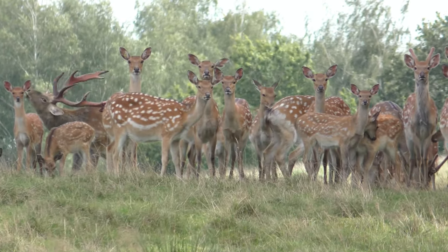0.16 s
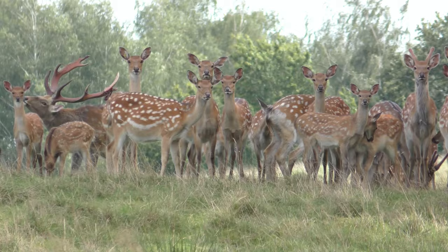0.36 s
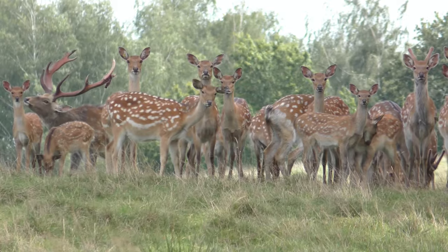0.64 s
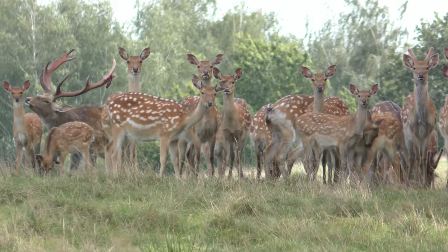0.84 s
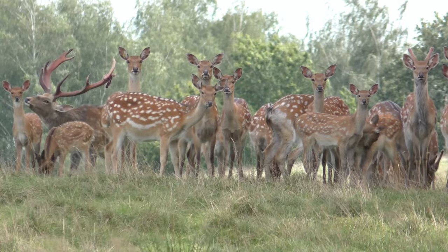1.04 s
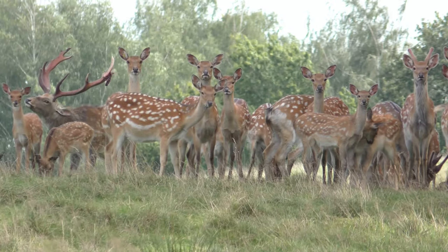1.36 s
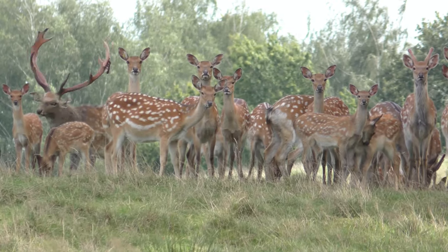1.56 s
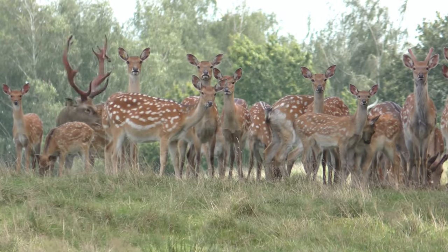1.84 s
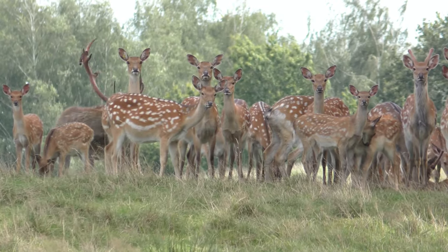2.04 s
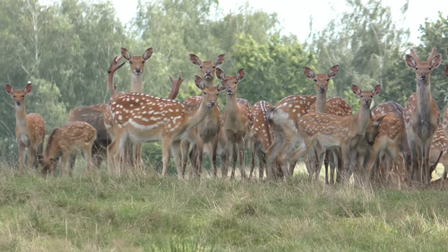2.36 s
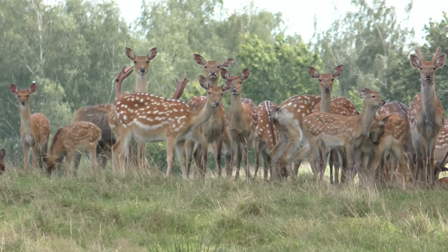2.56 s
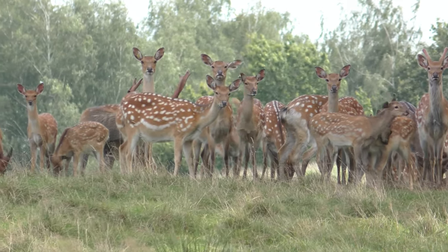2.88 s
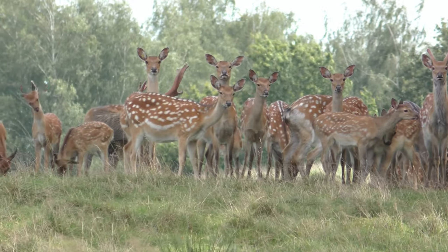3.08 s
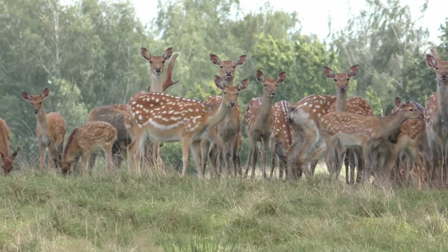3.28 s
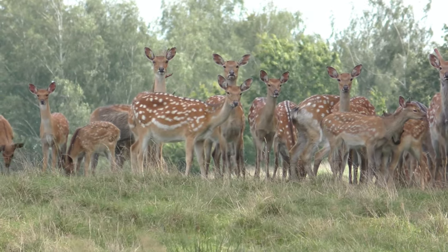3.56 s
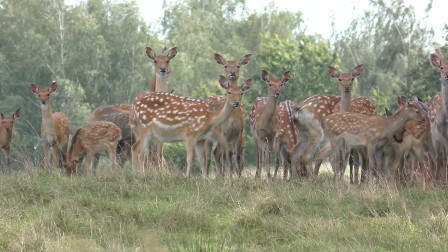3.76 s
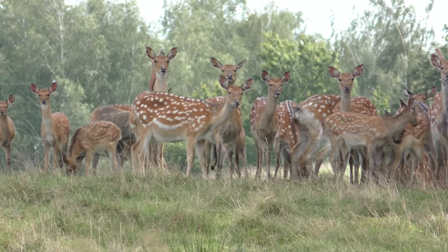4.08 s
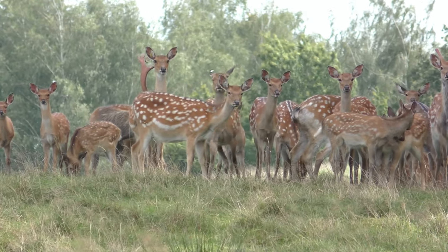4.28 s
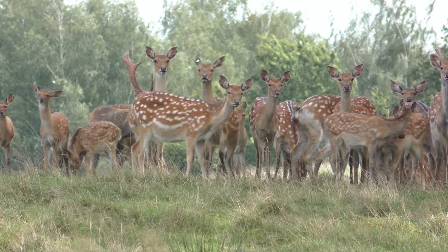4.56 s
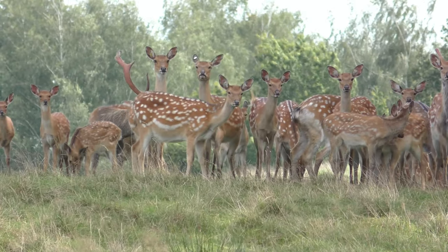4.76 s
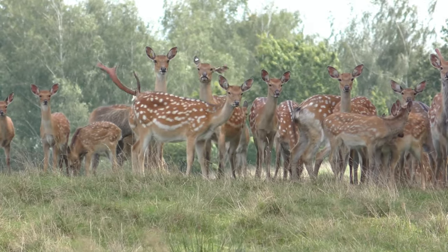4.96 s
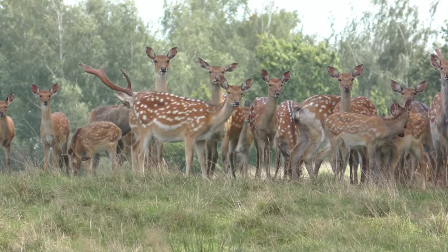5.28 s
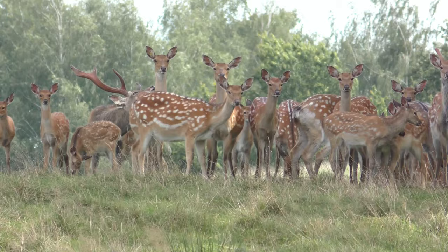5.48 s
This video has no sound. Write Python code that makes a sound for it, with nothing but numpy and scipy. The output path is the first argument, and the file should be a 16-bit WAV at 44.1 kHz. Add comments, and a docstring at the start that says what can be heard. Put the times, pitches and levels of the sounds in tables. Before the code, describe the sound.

High, squeaky deer calls, sometimes overlapping, echo faintly across a meadow over a steady low wind rumble.

```python
"""A shrill squeal cuts through low wind; then the hinds of a deer herd squeak to each other in a meadow.
Tight vocal folds give each squeak a high, nearly pure voice that arches, sags and often breaks into
a short croak as the folds slacken; the last sinks into a bleat. A line of trees returns a faint long echo.
Wind rumbles on the microphone, far leaves hiss, the grass rustles and a few dull thuds sound."""
import sys
import numpy as np
from scipy import signal
from scipy.fft import rfft, irfft, next_fast_len
from scipy.io import wavfile
from scipy.ndimage import uniform_filter1d

SR = 44100
rng = np.random.default_rng(int(sys.argv[2]) if len(sys.argv) > 2 else 0)


def dump_mix(stems):
    """Bounce the given channels to the path in sys.argv[1] as a 16-bit WAV at rate SR."""
    frames = np.atleast_2d(stems).T  # one column per channel
    limited = np.clip(frames, -1, 1)  # hard clip at full scale
    pcm = np.round(limited * 32767).astype(np.int16)
    wavfile.write(sys.argv[1], SR, pcm)


N = 248283
TIME = np.arange(N) / SR
SETTLE_S = .02   # a voice finds its note

# Hind calls, five groups each:
#   timing (start [s], length [s])
#   pitch  (note [Hz], scoop [share], fall [share], fall lateness [exponent], final break [share])
#   slips  list of (onset in call [s], pitch drop [share])
#   effort (level [dB], swell [dB], attack [s], dip time [s], dip depth [dB], dip width [s])
#   timbre (2nd harmonic at start, dip, end [dB], 3rd, 4th [dB re mean 2nd],
#           half-pitch lines [dB re fundamental], rasp [dB re fundamental], flutter [dB])
SQUEAKS = [ ((.551, .243), (5065, .12, .25, 3.7, .2), [(.035, .025), (.11, .008), (.187, .018)],
           (-13.9, 7.7, .017, .212, 15.5, .05), (-41, -51, -52, -3.5, -19, -40.5, -33.5, 1.5)),
           ((1.246, .216), (2775, .03, .38, 3.7, .42), [(.008, .05), (.18, .07)],
           (-19.9, -13.5, .016, .05, 13, .055), (-58, -45, -46, -7, -33, -37, -44, .6)), ((1.359, .272),
           (3550, .03, .31, 3.4, .01), [(.011, .025), (.09, .008), (.12, .015)],
           (-20, -5.6, .028, .149, 14.5, .027), (-51, -34, -64, -17, -17, -43, -35, .9)), ((2.493, .093),
           (3540, .02, .3, 1.6, .09), [(.037, .11)], (-18.2, -15, .018, .039, 16, .011),
           (-44, -38, -60, -19, -24, -44.5, -38, 2.6)), ((3.118, .298), (2835, -.07, .19, 4.5, .17),
           [(.112, .048), (.255, .085)], (-23.3, 4.2, .024, .024, 6, .013),
           (-57, -47, -39, -9.5, -14.5, -53.5, -48.5, .6)), ((4.3, .28), (4730, .02, .32, 1.15, .01),
           [(.088, .065), (.195, .03)], (-35.8, -4.5, .045, .229, 15, .012),
           (-71, -57, -64, -28, -30, -40, -38, 1.9)), ((4.426, .259), (2642, .01, .41, 4.8, .01),
           [(.008, .04)], (-31, 5, .016, .067, 8.9, .021), (-54, -45, -47, -11, -35, -27, -40.5, 1.1)),
           ((4.678, .422), (3160, .08, .33, 2.0, .02), [(.13, .015), (.216, .05)],
           (-36.5, 2, .035, .39, 16, .05), (-72, -84, -88, -22, -32, -43, -30, 1.27)), ((5.094, .042),
           (2000, .01, .07, 1.2, .02), [], (-34.5, -6, .013, .03, 2, .01),
           (-57, -68, -74, -22, -32, -41, -28.5, 1.27))]


def squeaks(out):
    """Each call swells or wanes; its fundamental dips once, where the second harmonic turns."""
    for (start_s, length_s), contour, slips, effort, timbre in SQUEAKS:
        mid_db, swell_db, attack_s, dip_s, dip_db, dip_width_s = effort
        start_db, turn_db, end_db, *colour = timbre
        t = elapsed(length_s)
        level_db = mid_db + swell_db * (t / length_s - .5) - dip_db * hump(t, dip_s, dip_width_s)
        second_db = np.interp(t, [0, dip_s, length_s], [start_db, turn_db, end_db])
        pitch_hz = squeak_pitch(t, slips, *contour)
        voice = tight_folds(t, pitch_hz, level_db, second_db, second_db.mean(), *colour)
        add(out, start_s, envelope(t, attack_s, release_s=.011) ** 1.4 * voice)


def squeak_pitch(t, slips, note_hz, scoop, fall, lateness, final_break,
                 flick_s=.005, slip_s=.005, recover_s=.03, break_s=.006):
    """The voice flicks in from above, settles, slips, sags ever faster as effort runs out, then breaks."""
    flick = .09 * np.exp(-t / flick_s)
    sag = fall * (t / t[-1]) ** lateness
    pitch_hz = note_hz * (1 + flick - scoop * np.exp(-t / SETTLE_S) - sag)
    for onset_s, drop in slips:
        since_s = np.maximum(t - onset_s, 0)
        pitch_hz *= 1 - drop * np.minimum(since_s / slip_s, 1) * np.exp(-since_s / recover_s)
    waver = 1 + .0035 * drift(30, len(t))
    collapse = 1 - final_break * np.exp((t - t[-1]) / break_s)
    return pitch_hz * waver * collapse


def tight_folds(t, pitch_hz, level_db, second_db, treble_db, third_db, fourth_db, half_db, rasp_db,
                flutter_db, jitter_per_db=.0027, upper_db_per_oct=16, half_db_per_oct=70):
    """Tightly stretched vocal folds: a strong fundamental with weak harmonics."""
    size = len(t)
    median_hz = np.median(pitch_hz)
    sag_oct = np.minimum(np.log2(pitch_hz / median_hz), 0)
    jitter = jitter_per_db * flutter_db * drift(120, size)
    phase = 2 * np.pi * np.cumsum(pitch_hz * (1 + jitter)) / SR
    level = from_db(level_db + flutter_db * drift(40, size))
    # uneven cycles spread noise round each harmonic, most at the onset
    rasp = from_db(rasp_db + 6 * np.exp(-t / .08) + 2 * drift(60, size))
    skirt = signal.butter(2, .22 * median_hz, fs=SR, output="sos")
    gain_noise, phase_noise = rasp * rms_one(signal.sosfilt(skirt, rng.standard_normal((2, size))))
    voice = level * (1 + gain_noise) * np.sin(phase + phase_noise)
    # upper harmonics fade as the folds slacken
    upper_db = treble_db + upper_db_per_oct * sag_oct
    overtones_db = [second_db, upper_db + third_db, upper_db + fourth_db, upper_db + fourth_db - 11]
    for k, db in enumerate(overtones_db, 2):
        overtone = (1 + from_db(9) * gain_noise) * np.sin(k * (phase + phase_noise))
        voice += from_db(db + 2 * drift(25, size)) * overtone * (k * pitch_hz < SR / 2)
    # alternate cycles differ while the folds are tight
    half_lines = np.sin(phase / 2) + .8 * np.sin(1.5 * phase) + .15 * np.sin(2.5 * phase)
    voice += level * from_db(half_db + half_db_per_oct * sag_oct + 3 * drift(25, size)) * half_lines
    hiss = rms_one(resonate(rng.standard_normal(size), pitch_hz.max(), .9 * median_hz))
    return np.sqrt(2) * voice + level * rasp * from_db(-14) * hiss


# Second, low vibration of the folds: (time [s], pitch [Hz], fundamental [dB], 2nd harmonic [dB])
UNDERTONE = [(.562, 1480, -53.5, -59), (.59, 1520, -37, -44), (.613, 1370, -37, -46.5),
             (.63, 1653, -45.5, -54), (.665, 2050, -57.5, -66), (.72, 1950, -53, -63.5),
             (.76, 1000, -63, -72)]


def undertone(out):
    """A faint, raspy second note wanders beneath the shrill squeal."""
    times_s, *columns = np.transpose(UNDERTONE)
    t = elapsed(times_s[-1] - times_s[0])
    pitch_hz, level_db, second_db = (np.interp(times_s[0] + t, times_s, column) for column in columns)
    voice = tight_folds(t, pitch_hz, level_db, second_db, treble_db=second_db,
                        third_db=9, fourth_db=2, half_db=-32, rasp_db=-14, flutter_db=3)
    add(out, times_s[0], envelope(t, attack_s=.003, release_s=.003) * voice)


# Call onsets: (time [s], level [dB], fade [s], mouth [Hz], width [Hz], bright edge [dB])
CATCHES = [(.553, -41.5, .065, 3020, 2400, -49.5), (1.233, -46, .011, 1903, 1195, -64),
           (3.113, -44.5, .0076, 1490, 2200, -61), (4.296, -53.5, .008, 4423, 1200, -78),
           (4.416, -50, .0091, 2100, 1390, -68)]


def catches(out):
    """The voice catches briefly as it starts."""
    for start_s, *mouth in CATCHES:
        add(out, start_s, mouth_croak(*mouth))


# Call endings:
# (time [s], level [dB], fade [s], mouth [Hz], width [Hz], bright edge [dB], chest [dB], chest [Hz])
CROAKS = [(.795, -30.5, .015, 870, 220, -47, -41.5, 410), (1.454, -40, .008, 1250, 420, -65, -53, 255),
          (1.64, -57, .021, 1100, 717, -72, -68, 270), (2.597, -44, .021, 680, 446, -66, -52, 285),
          (3.412, -22.5, .007, 1400, 520, -42, -31.5, 790),
          (4.683, -49.5, .011, 1120, 1198, -70, -50.5, 243)]


def croaks(out, lag_cycles=2.8, fade_cycles=7.5):
    """As the voice lets go, the mouth rings and the chest follows."""
    for start_s, *mouth, chest_db, chest_hz in CROAKS:
        add(out, start_s, mouth_croak(*mouth))
        chest = croak(chest_db, fade_cycles / chest_hz, chest_hz, width_hz=.7 * chest_hz)
        add(out, start_s + lag_cycles / chest_hz, chest)


def mouth_croak(level_db, fade_s, mouth_hz, width_hz, edge_db):
    """A croak through the mouth's first resonance and, more faintly, its next."""
    first = croak(level_db, fade_s, mouth_hz, width_hz)
    return first + croak(edge_db, 1.5 * fade_s, 2.7 * mouth_hz, 4.5 * width_hz)


def croak(level_db, fade_s, resonance_hz, width_hz, pitch_hz=430, lowpass_hz=5500):
    """Loose pulses ring through one resonance and die away."""
    t = elapsed(.2)
    folds = slack_folds(np.full(SR // 4, pitch_hz), roughness=1.2)
    lowpass = signal.butter(2, lowpass_hz, fs=SR, output="sos")
    voice = signal.sosfilt(lowpass, resonate(folds, resonance_hz, width_hz))
    voice = rms_one(voice[-len(t):])
    voice /= np.sqrt(uniform_filter1d(voice ** 2, size=220) + 1e-3)   # level evened over 5 ms
    decay = np.exp(-np.maximum(t - .005, 0) / fade_s)
    return from_db(level_db) * voice * np.minimum(t / .002, 1) * decay


def slack_folds(pitch_hz, roughness, jitter=.14, air=.45, limp=.6):
    """One pulse a cycle, uneven in time, alternately strong and weak, with air let through."""
    size = len(pitch_hz)
    cycles = np.cumsum(pitch_hz * (1 + jitter * roughness * drift(150, size))) / SR
    strength = from_db(6 * roughness * drift(250, size))
    alternation = 1 + limp * roughness * np.cos(np.pi * cycles)
    pulses = np.diff(np.floor(cycles), prepend=-1) * strength * alternation
    return rms_one(pulses) + air * roughness * rng.standard_normal(size)


# Throat resonances: (centre [Hz], width [Hz], gain [dB])
THROAT = [(325, 97, -22), (965, 250, -6.5), (1460, 210, -1), (2000, 100, -11.5), (2870, 300, -14.5)]


def bleat(out, start_s=5.11, length_s=.27, note_hz=385, overshoot_hz=65, sag_hz_per_s=400,
          level_db=-31, fade_db_per_s=85, closing_share=.1):
    """The folds slacken to a low, rough voice that sinks and clears as it fades and the mouth closes."""
    t = elapsed(length_s)
    pitch_hz = note_hz - sag_hz_per_s * t + overshoot_hz * np.exp(-t / SETTLE_S)
    mouth = 1 - closing_share * t / t[-1]
    folds = slack_folds(pitch_hz / mouth, roughness=.7 * hump(t, centre_s=.085, width_s=.11))
    voice = sum(from_db(db) * resonate(folds, hz, width_hz) for hz, width_hz, db in THROAT)
    voice = np.interp(np.cumsum(mouth) / SR, t, voice)   # read ever slower: the resonances sink
    level = envelope(t, attack_s=.035, release_s=.035) * from_db(level_db - fade_db_per_s * t)
    add(out, start_s, level * rms_one(voice))


# Colour difference between the two microphones: (frequency [Hz], left minus right [dB])
MIC_BALANCE = [(1000, 2), (2700, 2), (3500, -3), (4300, 3.5), (5000, 5.5), (7000, -5), (10000, -4.5),
               (14000, 4)]


def direct_sound(calls):
    """Each microphone colours the herd differently."""
    return np.array([coloured(calls, [(hz, side * db / 2) for hz, db in MIC_BALANCE]) for side in (1, -1)])


# Reflection spectrum: (frequency [Hz], gain [dB])
ECHO_SPECTRUM = [(300, -8.5), (1400, -5.5), (2200, -6), (2650, 3.5), (3500, 2), (4200, -9), (5100, -3.5),
                 (7500, -10), (15000, -20)]


def tree_echo(calls, t60_s=1.55, build_up_s=.12, ground_fade_s=.008):
    """Countless weak reflections: a short ground scatter, then a long one peaking at the wood's edge."""
    t = elapsed(2)
    wood = (1 - np.exp(-(t / build_up_s) ** 2)) * from_db(-60 * t / t60_s)
    wood *= 1 + .7 * hump(t, centre_s=.19, width_s=.025)
    ground = np.exp(-t / ground_fade_s)
    shape = from_db(-27) * wood / np.linalg.norm(wood) + from_db(-23) * ground / np.linalg.norm(ground)
    response = coloured(rng.standard_normal((2, len(t))), ECHO_SPECTRUM) * shape
    return signal.fftconvolve(calls[None], response, axes=1)[:, :N]


# Wind rumble: (frequency [Hz], relative density [dB])
WIND_SPECTRUM = [(8, -2.5), (18, 3.5), (30, -7), (45, -14.5), (62, -20.5), (85, -20), (120, -22),
                 (170, -29.5), (250, -34), (600, -62), (1200, -100)]


def wind(level_db=-35.5, gust_db=1.5):
    """Lumpy wind rumbles on the microphone."""
    level = from_db(level_db + gust_db * drift(4, N))
    return level * stereo_noise(WIND_SPECTRUM, correlation=-.35, pan_db=-5)


# Dull thuds: (time [s], swing gain [dB], knock gain [dB])
THUDS = [(1.139, -28.5, -51), (1.776, -28.5, -73), (1.975, -20.5, -42.5), (1.995, -30, -55),
         (2.029, -30, -66)]


def thuds(swing_hz=48, swing_fade_s=.017, knock_fade_s=.013):
    """Each thud is a heavily damped low swing with a short dull knock."""
    out = np.zeros((2, N))
    t = elapsed(.2)
    for start_s, swing_db, knock_db in THUDS:
        swing = -np.sin(2 * np.pi * swing_hz * t) * np.exp(-t / swing_fade_s)
        knock = rms_one(resonate(rng.standard_normal(len(t)), centre_hz=240, width_hz=300))
        knock *= np.minimum(t / .002, 1) * np.exp(-t / knock_fade_s)
        add(out, start_s, from_db(swing_db) * swing + from_db(knock_db) * knock, pan_db=-6)
    return out


# Grass noise: (frequency [Hz], relative density [dB])
GRASS_SPECTRUM = [(240, -29.5), (400, -7.5), (700, -4), (2000, -6.5), (7400, -7.5), (15500, -13)]
# Rustles: (time [s], level [dB], half length [s])
RUSTLES = [(2.43, -47, .15), (2.75, -67, .05), (2.92, -64, .04), (3.55, -70, .4), (3.86, -65, .06),
           (5.225, -61, .035), (5.44, -66, .08)]


def grass(rest_db=-74.5, flicker_db=1.3):
    """Grass stirs faintly and swells into brief rustles."""
    stirring = from_db(rest_db) + sum(from_db(db) * hump(TIME, s, width_s) for s, db, width_s in RUSTLES)
    flicker = from_db(flicker_db * drift(50, N))
    return stirring * flicker * stereo_noise(GRASS_SPECTRUM, correlation=.1, pan_db=2)


# Leaf hiss: (frequency [Hz], relative density [dB])
LEAF_SPECTRUM = [(150, -24), (300, -7.5), (500, -5.5), (1000, -7.5), (2000, -12), (2700, -12),
                 (3500, -14.5), (8000, -22), (15500, -28.5)]


def leaves(level_db=-62.5):
    """Far leaves hiss steadily."""
    return from_db(level_db) * stereo_noise(LEAF_SPECTRUM, correlation=.25, pan_db=-4.5)


def from_db(db):
    """Decibels to gain."""
    return 10 ** (np.asarray(db) / 20)


def rms_one(x):
    """Scale to unit power."""
    return x / np.sqrt(np.mean(x ** 2) + 1e-20)


def elapsed(length_s):
    """Sample times from zero."""
    return TIME[:int(length_s * SR)]


def hump(t, centre_s, width_s):
    """Smooth bell of height 1."""
    return np.exp(-((t - centre_s) / width_s) ** 2)


def envelope(t, attack_s, release_s):
    """Linear attack, hold at 1, linear release."""
    return np.clip(t / attack_s, 0, 1) * np.clip((t[-1] - t) / release_s, 0, 1)


def drift(rate_hz, size):
    """Smooth random motion of unit power."""
    pole = np.exp(-2 * np.pi * rate_hz / SR)
    noise = rng.standard_normal(size + SR // 10)
    return rms_one(signal.lfilter([1], [1, -2 * pole, pole * pole], noise)[-size:])


def resonate(x, centre_hz, width_hz):
    """Two equal resonant stages, peak gain 1."""
    radius = np.exp(-np.pi * width_hz / SR)
    gain = (1 - radius ** 2) / 2
    stage = [gain, 0, -gain, 1, -2 * radius * np.cos(2 * np.pi * centre_hz / SR), radius ** 2]
    return signal.sosfilt([stage, stage], x)


def coloured(x, spectrum):
    """Filter by a spectrum drawn on a log-frequency axis."""
    size = next_fast_len(x.shape[-1])
    hz, db = np.transpose(spectrum)
    bins_hz = np.maximum(np.fft.rfftfreq(size, 1 / SR), 1)
    gain = from_db(np.interp(np.log(bins_hz), np.log(hz), db))
    return irfft(rfft(x, size) * gain, size)[..., :x.shape[-1]]


def panned(sound, pan_db):
    """Stereo placement; positive is left."""
    return sound * from_db([[pan_db / 2], [-pan_db / 2]])


def stereo_noise(spectrum, correlation, pan_db):
    """Coloured noise, partly shared by the two channels."""
    mid, side = coloured(rng.standard_normal((2, N)), spectrum)
    pair = np.sqrt(1 + correlation) * mid + np.sqrt(1 - correlation) * side * [[1], [-1]]
    return panned(rms_one(pair), pan_db)


def add(out, start_s, sound, pan_db=0):
    """Mix a mono sound into a stereo track."""
    at = int(start_s * SR)
    sound = sound[:N - at]
    out[:, at:at + len(sound)] += panned(sound, pan_db)


def scene():
    """The herd straight ahead, its echo and the meadow."""
    herd = np.zeros((2, N))
    for voice in (squeaks, undertone, catches, croaks, bleat):
        voice(herd)
    calls = herd.mean(axis=0)
    return direct_sound(calls) + tree_echo(calls) + wind() + leaves() + grass() + thuds()


def record(dry):
    """Steep low-pass on the top treble."""
    cutoff_hz = 15750
    return signal.sosfilt(signal.ellip(12, .1, 80, cutoff_hz, fs=SR, output="sos"), dry)


dry = scene()
out = record(dry)
dump_mix(out)
```